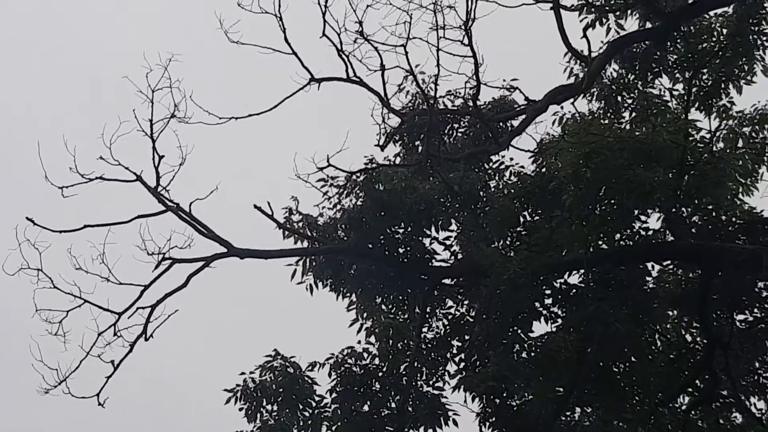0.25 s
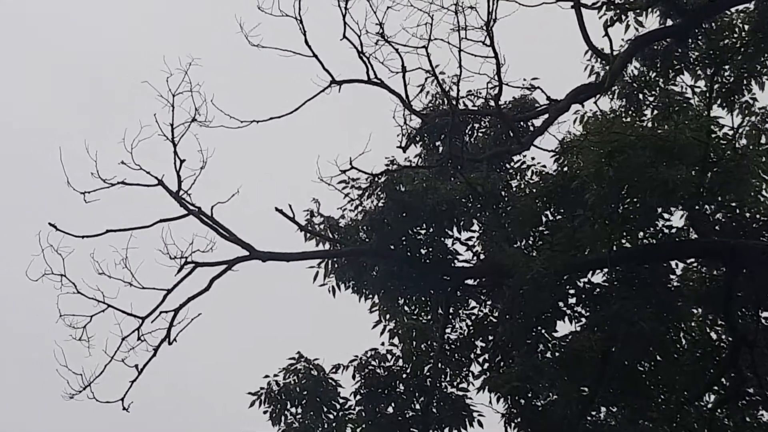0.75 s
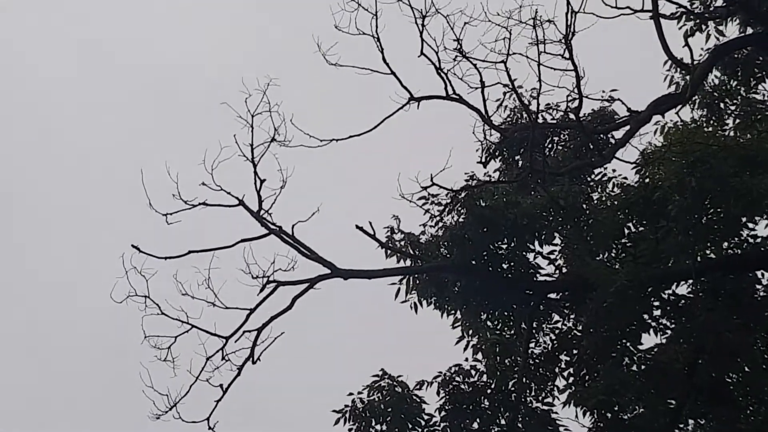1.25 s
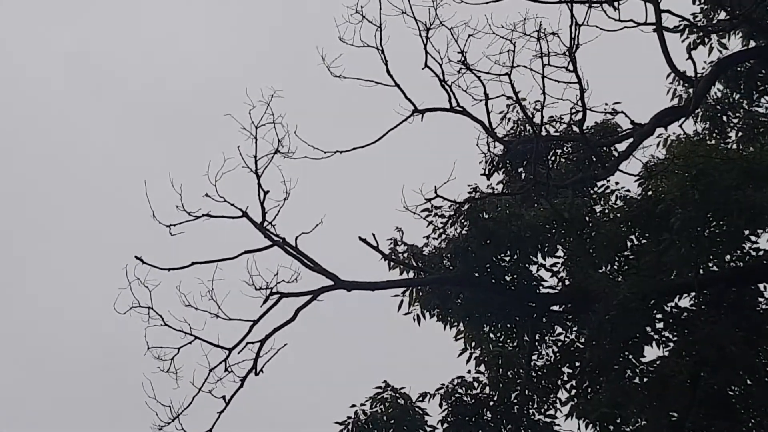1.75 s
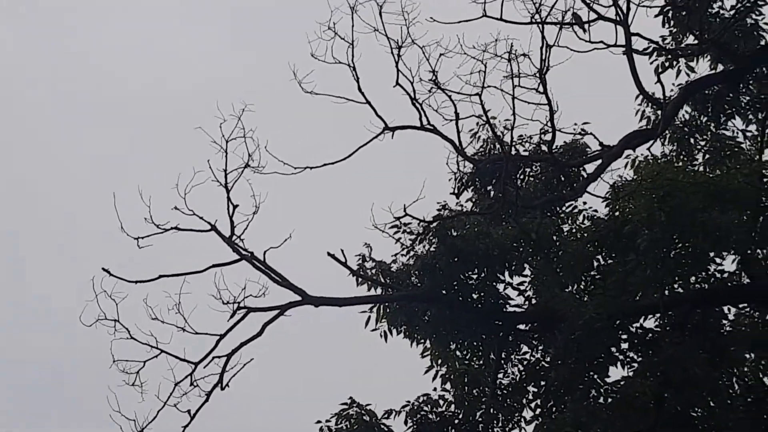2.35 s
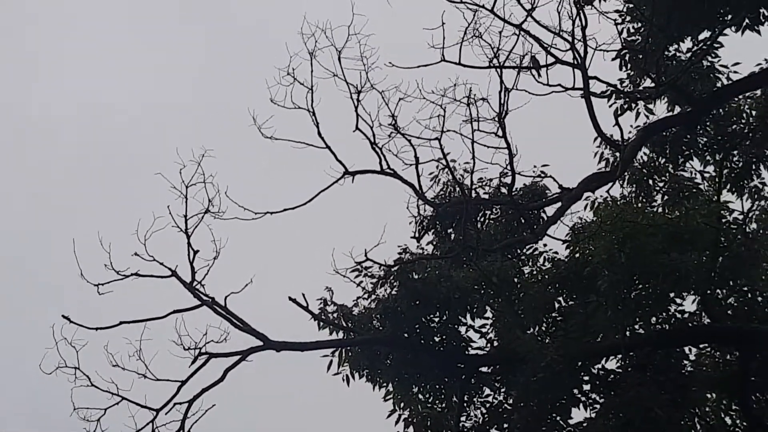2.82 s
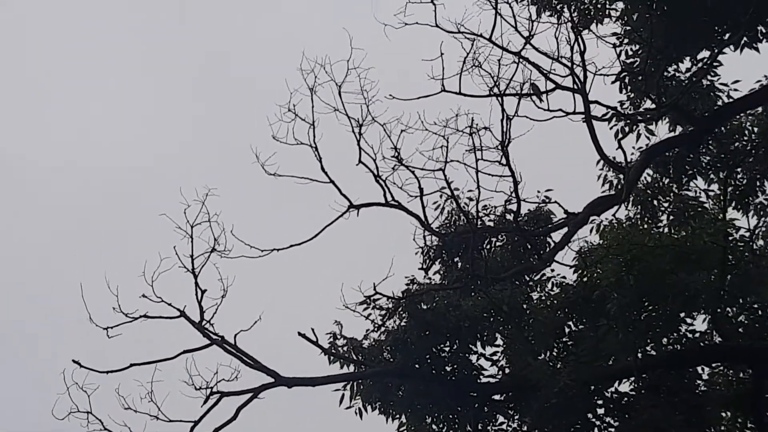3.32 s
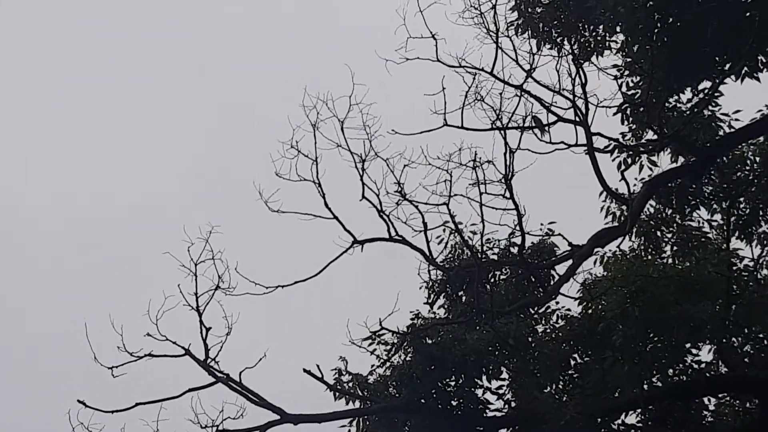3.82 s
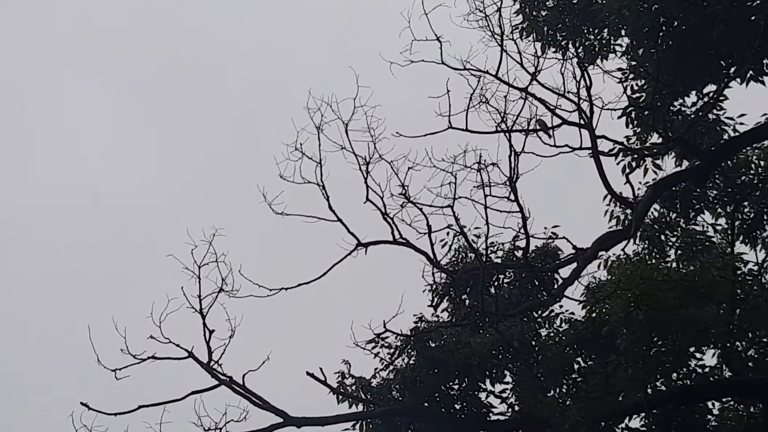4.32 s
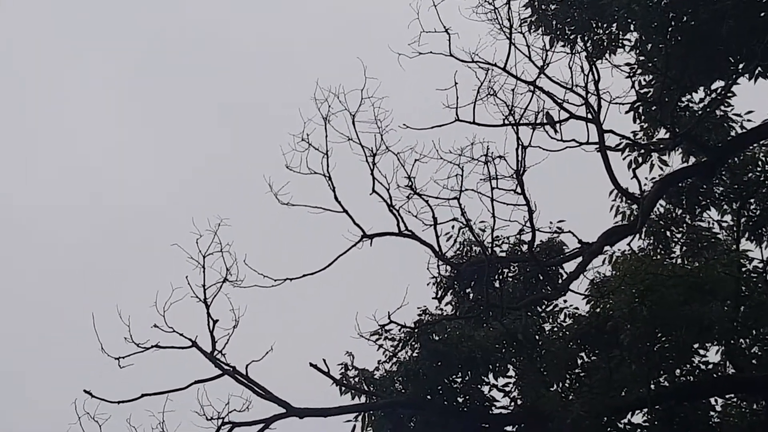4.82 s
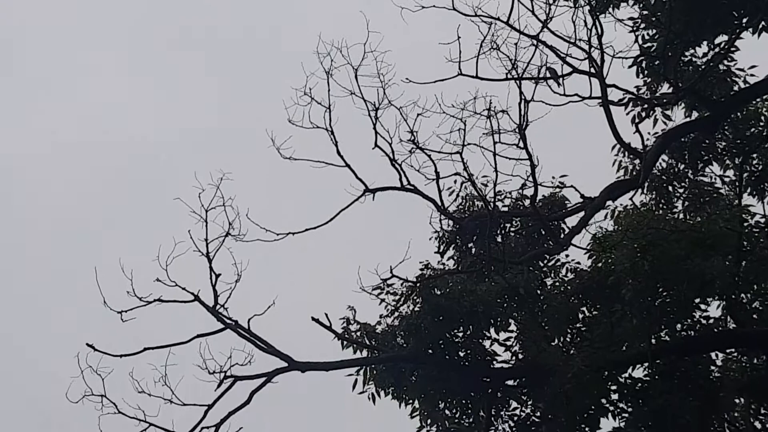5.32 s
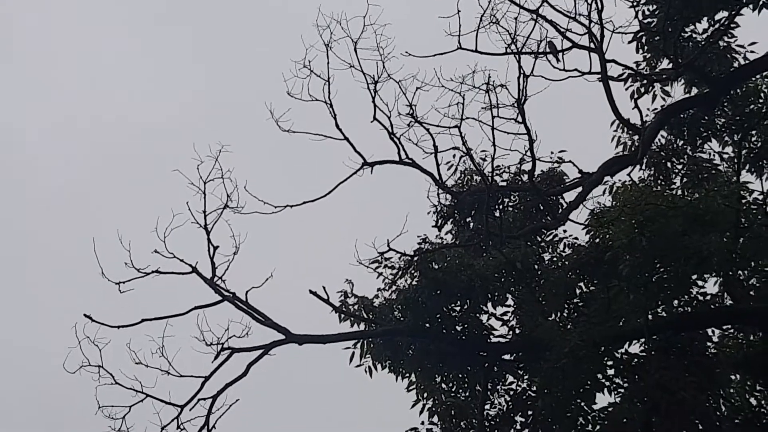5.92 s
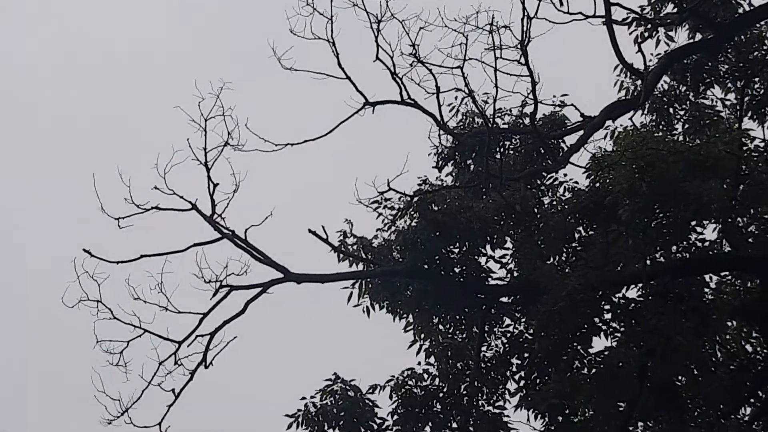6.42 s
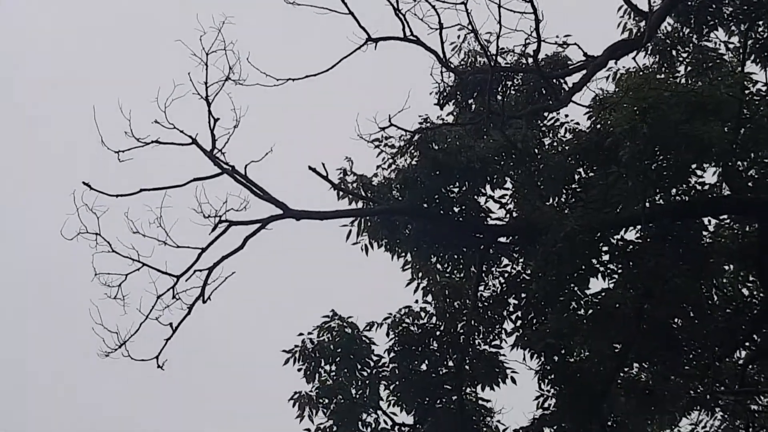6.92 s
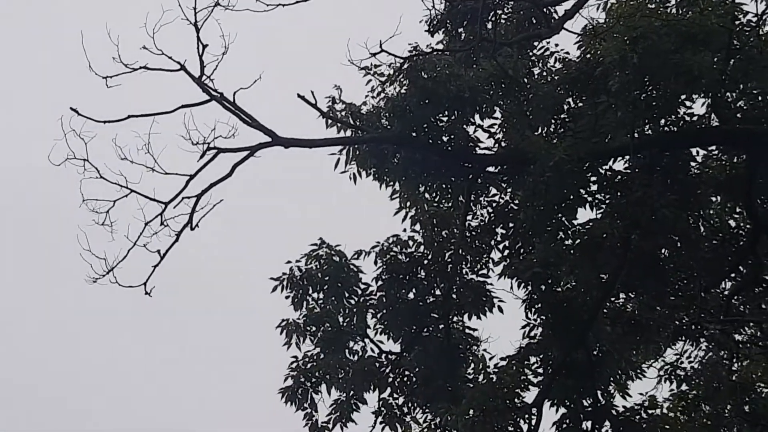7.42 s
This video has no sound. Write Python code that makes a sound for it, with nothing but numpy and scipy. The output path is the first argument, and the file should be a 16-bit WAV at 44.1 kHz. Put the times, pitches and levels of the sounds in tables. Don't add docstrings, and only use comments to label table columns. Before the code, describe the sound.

A lively wooded edge in wide outdoor stereo, with short scattered echoes from trunks and leaves. Dull knocks bump the left microphone in the first half second, with a faint touch at 1.3 and a twig tick at 1.8. A harsh, nasal squawk slides down on the right at 0.3, returning roughly every second until 7.5. Ahead, another caller yelps at 0.2, then in quick succession from 2.1 to 2.7, with falling squawks at 1.3, 4.8 and 5.6. Dry rasps cluster at 1.6, 3.3-4.4 and 6.6-7.3. Toads croak in buzzing swells throughout, with thin stepped whines and soft low hoots; a pulsing purr joins from 3.6, longer after 4.8. Burry bird phrases sound at 1.7, 3.8 and 6.4, among brief falling peeps. A distant flock chatters in waves, while high insect sizzle and faint traffic rumble continue underneath.

```python
import sys
import numpy as np
from scipy import signal
from scipy.io import wavfile
from scipy.ndimage import uniform_filter1d

SR = 44100
rng = np.random.default_rng(int(sys.argv[2]) if len(sys.argv) > 2 else 0)


def ratio(d):
    e = np.asarray(d, float) / 20
    return 10 ** e


def store_pcm(level_fs):
    pcm = np.round(np.clip(level_fs, -1, 1) * 32767).astype(np.int16)
    wavfile.write(sys.argv[1], SR, np.atleast_2d(pcm).T)


N = 337806


def evened(x):
    return x / np.sqrt(np.mean(x ** 2) + 1e-20)


def add(mix, s, sound):
    part = mix[max(round(s * SR), 0):][:len(sound)]
    part += sound[:len(part)]


def call_share(length):
    return np.linspace(0, 1, round(length * SR))


def curve(rows):
    return np.interp(np.arange(N) / SR, *np.transpose(rows))


def unroll(rows):
    s, *columns = np.transpose(rows)
    t = np.arange(s[0], s[-1], 1 / SR)
    return [t] + [np.interp(t, s, c) for c in columns]


def wobble(n, size):
    once = uniform_filter1d(rng.standard_normal(n), size)
    return evened(uniform_filter1d(once, size))


def resonate(x, hz, width):
    turn = np.exp(2j * np.pi * np.cumsum(hz * np.ones(len(x))) / SR)
    r = np.exp(-np.pi * width / SR)
    low = signal.lfilter([1 - r], [1, -r], x / turn)
    low = signal.lfilter([1 - r], [1, -r], low)
    return 2 * (turn * low).real


def pulses(hz, top_hz, jitter):
    turns = np.cumsum(hz * (1 + jitter * wobble(len(hz), size=60))) / SR + rng.random()
    k = np.arange(1, int(top_hz / hz.max()))[:, None]
    knots = rng.standard_normal((len(k), len(hz) // 700 + 2))
    uneven = ratio(3.5 * signal.resample(knots, 8 * knots.shape[1], axis=1))
    uneven = uneven.repeat(88, axis=1)[:, :len(hz)]
    train = (uneven * np.cos(2 * np.pi * k * turns + k * k / 9)).sum(0)
    puffs = (.3 + np.exp(-(turns % 1) / .3)) * rng.standard_normal(len(hz))
    return evened(train), evened(puffs)


def tones(tables, waver, edge):
    out = np.zeros(N)
    for rows in tables:
        t, hz, db = unroll(rows)
        turns = np.cumsum(hz * (1 + waver * wobble(len(t), size=300))) / SR
        tone = np.sqrt(2) * ratio(db) * np.sin(2 * np.pi * turns)
        add(out, t[0], tone * signal.windows.tukey(len(t), edge))
    return out


def trees(x, t60=0.18):
    taps = np.zeros((2, SR))
    at = np.arange(200, SR - 30, 30) + rng.integers(0, 30, (2, (SR - 201) // 30))
    np.put_along_axis(taps, at, rng.choice([-1., 1.], at.shape), 1)
    taps *= ratio(-60 * np.arange(SR) / SR / t60)
    return signal.fftconvolve(x[None], taps / np.linalg.norm(taps[0]), axes=1)[:, :N]


def place(x, lag, pan_db):
    return np.array([np.roll(x, lag) * ratio(pan_db / 2), x * ratio(-pan_db / 2)])


def hum():
    return ratio(-72.5) * evened(resonate(rng.standard_normal(N), hz=67, width=14))


def air():
    # (frequency [Hz], level per Hz [dB])
    air_colour = [(24, -59), (40, 1.5), (80, 0.5), (183, -16), (407, -14.5), (799, -20.5), (1280, -24.5),
                  (1570, -22.5), (2800, -27), (4250, -21.5), (5460, -19.5), (6500, -19.5), (9210, -28.5),
                  (12400, -25.5), (15600, -26)]
    # (frequency [Hz], likeness [0-1])
    likeness = [(60, 0.73), (300, 0.72), (800, 0.18), (3000, 0.034)]
    level_db = -61
    frames, log_hz = N // 256 + 5, np.log(np.fft.rfftfreq(1024, 1 / SR) + 1)
    a, b, c, d, patches = rng.standard_normal((frames, 513, 5)).T
    patches = evened(uniform_filter1d(uniform_filter1d(patches, 10, 0), 16, 1))
    colour, same = (np.interp(log_hz, np.log(np.array(p)[:, 0]), np.array(p)[:, 1])[:, None]
                    for p in (air_colour, likeness))
    same = np.clip(same, 0, 1)
    left = a + 1j * b
    right = same * left + np.sqrt(1 - same ** 2) * (c + 1j * d)
    z = np.array([left, right]) * ratio(colour + 1.5 * patches)
    return ratio(level_db) * evened(signal.istft(z, nperseg=1024, noverlap=768)[1][:, :N])


def sizzle():
    # (time [s], level [dB])
    singing = [(0.0, -76), (1.21, -69.5), (1.47, -83), (2.41, -74), (3.13, -79), (3.71, -68), (4.18, -77),
               (4.88, -68), (5.33, -84), (6.31, -65), (6.5, -80), (7.66, -69)]
    swarm_hz, drift_hz, even_db = 6280, 120, -76
    hz = swarm_hz + drift_hz * wobble(N, size=12000)
    db = curve(singing) + 2.2 * wobble(N, size=2000)
    ring = [evened(resonate(rng.standard_normal(N), hz, 600)) for _ in range(2)]
    steady = [evened(resonate(rng.standard_normal(N), 6500, 240)) for _ in range(2)]
    return ratio(db + 0.5) * np.array(ring) + ratio(even_db) * np.array(steady)


def chatter():
    # (time [s], level [dB])
    flock = [(0, -101), (.42, -53), (.7, -86), (.95, -70), (1.6, -70.5), (2.4, -75), (2.7, -84),
             (3.16, -67), (4.7, -63), (4.95, -82), (5.6, -63.5), (6.05, -62), (6.3, -82), (6.8, -63),
             (7.3, -71), (7.66, -90)]
    out, t = np.zeros(N), np.arange(700) / SR
    for hz, fall in rng.uniform([3500, 10000], [5300, 60000], (30, 2)):
        chirp = np.hanning(len(t)) * np.sin(2 * np.pi * (hz * t - fall * t ** 2 / 2))
        starts = (rng.random(N) < 8 / SR) * ratio(3 * rng.standard_normal(N))
        out += signal.oaconvolve(starts, chirp)[:N]
    return evened(trees(out, t60=0.11)) * ratio(curve(flock))


def birds():
    # (time [s], pitch [Hz], level [dB])
    phrase = [(0, 4700, -2), (.01, 5800, 1), (.025, 4700, -2), (.045, 4100, 0), (.06, 3300, -4),
              (.082, 4200, 1), (.095, 4200, -25), (.11, 3900, -9), (.13, 5200, -14)]
    # (time [s], level [dB])
    sung = [
        (1.69, -54),
        (3.835, -55),
        (6.41, -52),
    ]
    # (start [s], length [s], start pitch [Hz], end pitch [Hz], level [dB])
    peep_table = [(0.603, 0.031, 4340, 3700, -58), (0.902, .02, 4120, 3480, -80),
                  (1.081, 0.037, 5310, 3900, -61), (2.415, 0.023, 5300, 3630, -61),
                  (5.072, 0.028, 4380, 3420, -60.5), (5.205, 0.037, 5200, 3890, -61.5),
                  (5.268, 0.037, 4310, 3510, -61), (5.34, 0.032, 4700, 3800, -89),
                  (6.037, 0.038, 5270, 4320, -64), (6.147, 0.032, 5320, 2950, -59),
                  (6.713, 0.023, 5230, 3800, -61)]
    fade_db = -1
    phrases = [np.array(phrase) + [s, 0, db] for s, db in sung]
    peeps = [[(s, first_hz, db), (s + length, last_hz, db + fade_db)]
             for s, length, first_hz, last_hz, db in peep_table]
    return tones(phrases + peeps, waver=.02, edge=.2) * ratio(3.5 * wobble(N, size=90))


def hoots():
    # (start [s], length [s], level [dB], held pitch [Hz])
    hoot_table = [(0.681, 0.2, -68, 418), (1.2, 0.14, -68.5, 445), (1.637, .23, -67.5, 418),
                  (2.21, 0.14, -71, 444), (2.626, 0.15, -65.5, 426.6), (3.681, 0.21, -70, 419.7),
                  (3.929, 0.19, -66, 439), (4.359, .32, -61.5, 413.5), (5.646, 0.12, -62, 422),
                  (6.537, 0.24, -61.5, 417), (6.9, 0.202, -63, 408)]
    scoop, edge_db = 0.97, 0
    notes = [[(s, scoop * hz, db + edge_db), (s + length / 2, hz, db), (s + length, hz, db + edge_db)]
             for s, length, db, hz in hoot_table]
    return tones(notes, waver=0.034, edge=0.24) * ratio(3.4 * wobble(N, size=900))


def purr():
    # (start [s], length [s], level [dB], sac at start [Hz], sac at end [Hz])
    purr_table = [
        (3.55, 0.31, -64.5, 458, 410),
        (4.78, 0.49, -60, 514, 422),
        (5.52, 0.26, -59.5, 472, 423),
        (5.886, .48, -60.5, 446, 462),
        (7.002, .47, -59, 518, 467),
    ]
    sag_db = -4
    out = np.zeros(N)
    for s, length, db, *sac_hz in purr_table:
        share = call_share(length)
        train, puffs = pulses(54 - 7 * share, 900, jitter=0.1096)
        drive = train + 1.8 * puffs
        sac = resonate(drive, np.linspace(*sac_hz, len(share)), 41)
        sac = sac + 0.57 * resonate(drive, 482, 172)
        swell = ratio(db + sag_db * share) * signal.windows.tukey(len(share), .45)
        add(out, s, swell * evened(sac))
    return out


def toads():
    # (loudest moment [s], level [dB])
    croaks = [(0.189, -48.5), (0.814, -49), (1.648, -50.5), (3.11, -50), (3.71, -49), (4.492, -48.5),
              (5.098, -51), (6.033, -50.5), (6.87, -49.5), (7.529, -47.5)]
    # (time from loudest moment [s], rate [Hz])
    croak_hz = [(-.12, 171), (-.04, 155.6), (0, 152.3), (.12, 150)]
    # (frequency [Hz], width [Hz], level [dB])
    sac_table = [(1220, 67, -16), (1475, 537, 20), (1873, 510, 2)]
    # (start [s], length [s], first step level [dB], second step level [dB])
    whines = [(0.029, 0.36, -64, -76), (1.514, 0.36, -67, -69.5), (2.5, 0.4, -65, -85),
              (3.52, 0.33, -65.5, -68.5), (4.08, 0.16, -83, -80), (4.398, 0.29, -69.5, -70),
              (5.355, 0.4, -66.5, -69), (6.467, 0.27, -85, -84), (6.803, 0.3, -74, -68)]
    # (share of the call [0-1], pitch [Hz])
    whine_hz = [(0, 218), (.2, 222.7), (.5, 230.9), (.65, 240.6), (1, 244.7)]
    # (multiple of the pitch [1], level [dB])
    whine_orders = [(2, -0.5), (3, -9), (5, -4.5), (6, 0.5), (7, 6.5), (8, 8), (9, -7.5)]
    out = np.zeros(N)
    t, hz = unroll(croak_hz)
    for s, db in croaks:
        train, puffs = pulses(hz, 2600, jitter=0.0091)
        drive = signal.lfilter(*signal.butter(4, 1050, "high", fs=SR), train + 1.5 * puffs)
        sac = evened(sum(ratio(d) * resonate(drive, f, w) for f, w, d in sac_table))
        add(out, s + t[0], ratio(db) * np.exp(-(t / .062) ** 2) * sac)
    for s, length, first_db, second_db in whines:
        share = call_share(length)
        pitch = np.interp(share, *np.transpose(whine_hz))
        turns = np.cumsum(pitch * (1 + .006 * wobble(len(share), size=200))) / SR
        stack = sum(ratio(db) * np.sin(2 * np.pi * k * turns + k * k) for k, db in whine_orders)
        swell = ratio(first_db) * np.exp(-((share - .33) / 0.24) ** 2)
        swell += ratio(second_db) * np.exp(-((share - .73) / 0.1) ** 2)
        add(out, s, 1.6 * swell * stack * ratio(2.45 * wobble(len(share), size=500)))
    return out


def bumps():
    # (time [s], peak level [dB], pitch [Hz])
    knocks = [
        (0.046, -37.5, 161),
        (0.387, -47.5, 190),
        (0.409, -45, 336),
        (0.459, -51, 133),
        (0.489, -57, 348),
        (1.269, -50.5, 320),
    ]
    out, t = np.zeros(N), np.arange(2200) / SR
    for s, db, hz in knocks:
        envelope = (1 - np.exp(-t / 0.00043)) * np.exp(-t / 0.0088)
        add(out, s - .004, ratio(db + 7.5) * envelope * np.sin(2 * np.pi * hz * t))
    add(out, 1.772, ratio(-43.5) * np.exp(-t / 0.00064) * rng.standard_normal(len(t)))
    return out * ratio(np.array([[0], [-14]]))


def squawk(hz, mouth_hz, rough, closing_db=16):
    # (frequency [Hz], width [Hz], level [dB])
    throat = [(1278, 400, -13), (1848, 840, -7.5), (2700, 400, -4.5), (3249, 456, 2), (5030, 3150, 3),
              (6850, 2470, -7), (8350, 1620, -16), (13130, 2640, -24.5)]
    train, puffs = pulses(hz, 6500, jitter=.008)
    share = np.linspace(0, 1, len(hz))
    mouth = np.interp(share ** 0.98, [0, 1], mouth_hz)
    out = ratio(3) * resonate(train + 0.75 * rough * puffs, mouth, 890)
    slack = (hz / hz.max()) ** 1.44
    for k, (f, w, db) in enumerate(throat):
        drive = train + rough * (f / 4000) ** 2 * puffs
        level = ratio(db - closing_db * share * (f > 4000))
        out += (-1) ** k * level * resonate(drive, f * slack, w)
    out = signal.lfilter(*signal.iirnotch(2150, 2.1, SR), out)
    out = signal.lfilter(*signal.butter(4, 1000, "high", fs=SR), out)
    loudness = np.sqrt(uniform_filter1d(out ** 2, 900) + 1e-12)
    ends = np.clip(np.minimum(share / 0.085, (1 - share) / 0.1), 0, 1)
    return out / loudness * ratio(1.42 * wobble(len(hz), size=200)) * ends


def effort(share, length, db):
    rise_s, sag_db_per_s, let_go_db = 0.023, -18.5, -14.5
    rise = np.clip(share * length / rise_s, 0, 1) ** 1.14
    return rise * ratio(db + sag_db_per_s * share * length + let_go_db * share ** 4.1)


def arch(share, first, top, last):
    return uniform_filter1d(np.interp(share, [0, top, 1], [first, 1, last]), size=500, mode="nearest")


def ahead_caller():
    # (start [s], length [s], effort [dB], top pitch [Hz])
    yelps = [
        (0.222, 0.086, -46.5, 467),
        (2.092, 0.072, -44.5, 489.4),
        (2.214, 0.07, -44.5, 484.6),
        (2.451, 0.076, -42, 496),
        (2.655, 0.065, -42, 484.5),
    ]
    # (start [s], length [s], effort [dB], top pitch [Hz], end over top pitch [1])
    falling = [
        (1.329, 0.12, -45, 467.5, 0.75),
        (4.778, .15, -43.5, 486.3, 0.74),
        (5.617, 0.18, -45.5, 480.7, 0.69),
        (5.913, 0.17, -55, 427, 0.71),
    ]
    peak, edge_db = 0.65, -6
    out = np.zeros(N)
    for s, length, db, hz in yelps:
        share = call_share(length)
        swell = ratio(db + edge_db * ((share - peak) / .5) ** 2)
        pitch = hz * arch(share, first=0.87, top=.62, last=.86)
        mouth = hz * np.array((11.8, 6.5))
        add(out, s - .006, swell * squawk(pitch, mouth, rough=1.0, closing_db=14.5))
    for s, length, db, hz, last in falling:
        share = call_share(length)
        pitch = hz * arch(share, first=.93, top=.25, last=last)
        mouth = hz * 8.8, hz * last * 8.35
        add(out, s - .006, effort(share, length, db) * squawk(pitch, mouth, rough=0.94, closing_db=14))
    return out


def right_caller():
    # (start [s], length [s], effort [dB], opening pitch [Hz], pitch at the bend [Hz])
    squawks = [(0.306, .16, -46, 417, 392.8), (1.237, .17, -46.5, 414.6, 393.7),
               (2.158, 0.14, -49, 386.6, 345.8), (2.811, 0.11, -49, 402, 375.2),
               (3.488, 0.17, -47, 406.7, 360.2), (4.464, 0.17, -47, 420.3, 400),
               (5.408, .18, -46, 421.5, 401), (6.24, 0.18, -47, 411.5, 396.5),
               (6.785, .205, -47, 413, 360.3), (7.484, .13, -47.5, 415.7, 369.6)]
    # (time [s], peak level [dB], length [s])
    rasps = [(1.54, -43.5, 0.029), (1.6396, -40, 0.045), (3.277, -53, 0.05), (3.401, -46.5, 0.063),
             (3.757, -39, 0.032), (3.841, -39, 0.09), (3.9364, -38, 0.056), (4.106, -50, 0.048),
             (4.206, -42.5, 0.037), (4.387, -46.5, 0.026), (5.23, -68, 0.058), (6.617, -44.5, 0.0478),
             (6.728, -43, 0.037), (7.007, -39, 0.058), (7.165, -39.5, 0.039), (7.2635, -40.5, 0.039),
             (7.332, -40, 0.032)]
    bend, last_drop = .6, .87
    mouth_open, mouth_shut = 12.46, 8.02
    out = np.zeros(N)
    for s, length, db, first_hz, bend_hz in squawks:
        share = call_share(length)
        hz = np.interp(share, [0, bend, 1], [first_hz, bend_hz, last_drop * bend_hz])
        mouth = mouth_open * hz[0], mouth_shut * hz[-1]
        add(out, s - .008, effort(share, length, db) * squawk(hz, mouth, rough=0.57))
    for s, db, length in rasps:
        share = call_share(length)
        swell = ratio(db - 17.0) * np.sin(np.pi * share ** 0.72)
        rasp = squawk(410 - 60 * share, (5300, 3100), rough=1.57, closing_db=24)
        add(out, s - .008, swell * rasp)
    return out


def scene():
    lags = dict(right=12, ahead=2, toads=-18, hoot=-22, purr=8, birds=-16)
    # (sound, left over right [dB])
    near = dict(right=(right_caller() * ratio(6), -2.5), ahead=(ahead_caller() * ratio(-1.5), .8))
    far = dict(toads=(toads(), -.5), purr=(purr() * ratio(2.0), .3), birds=(birds(), 3), hoot=(hoots(), 1.5))
    direct = sum(place(x, lags[name], pan) for name, (x, pan) in {**near, **far}.items())
    echoes = ratio(-1.5) * trees(near["right"][0] + near["ahead"][0], t60=0.24)
    echoes += ratio(-4) * trees(sum(x for x, _ in far.values()), t60=0.38)
    echoes += ratio(-7) * trees(far["birds"][0], t60=.35)
    return direct + echoes + chatter() + sizzle() + air() + hum() + bumps()


def top_cut(x):
    return signal.sosfilt(signal.butter(12, 15710, fs=SR, output="sos"), x)


def record(dry):
    edges = signal.butter(3, [42, 15800], "band", fs=SR, output="sos")
    mix = signal.sosfilt(edges, dry)
    return top_cut(mix)


dry = scene()
out = record(dry)
store_pcm(out)
```